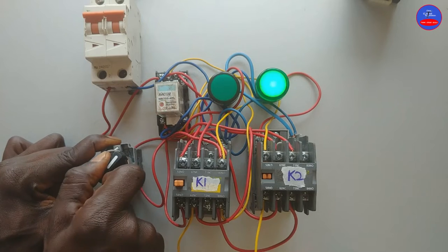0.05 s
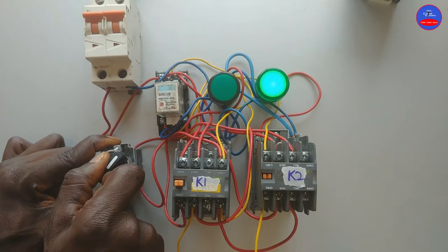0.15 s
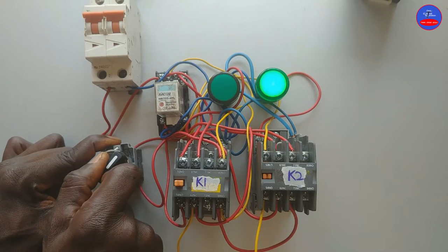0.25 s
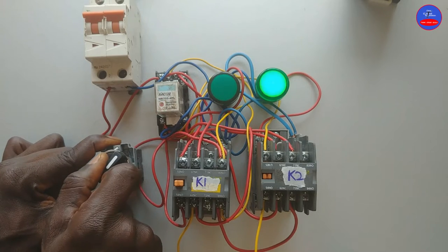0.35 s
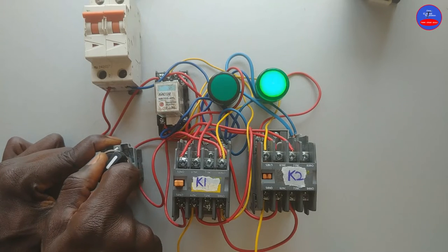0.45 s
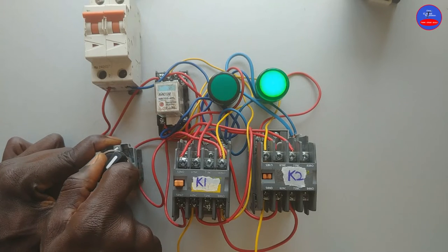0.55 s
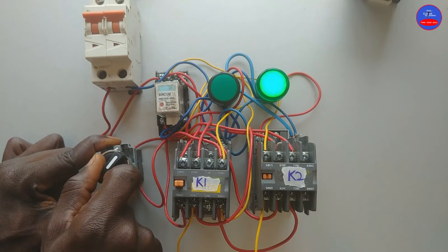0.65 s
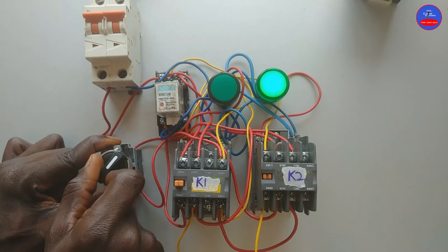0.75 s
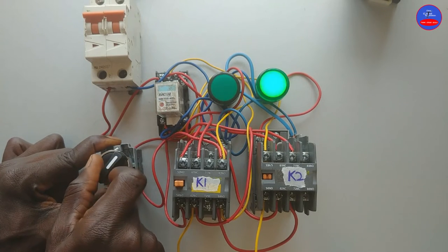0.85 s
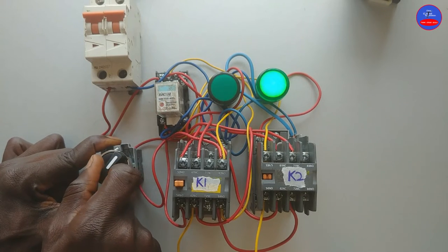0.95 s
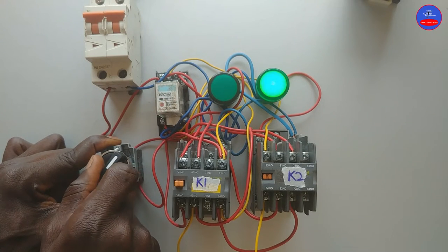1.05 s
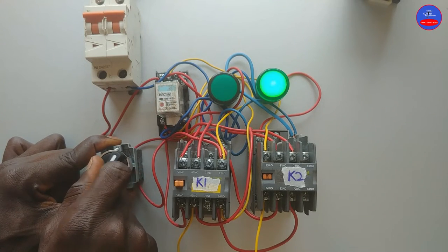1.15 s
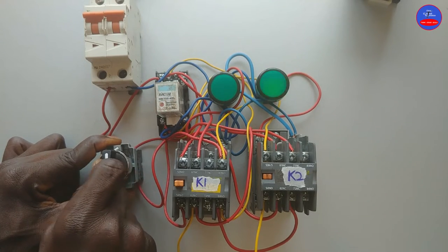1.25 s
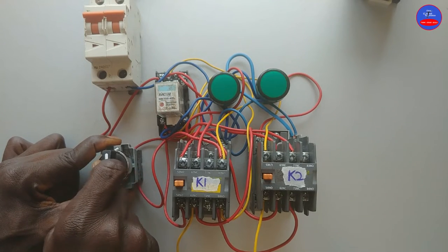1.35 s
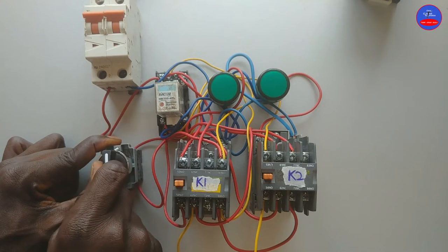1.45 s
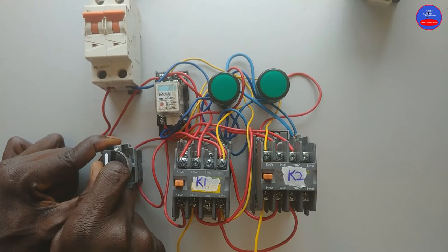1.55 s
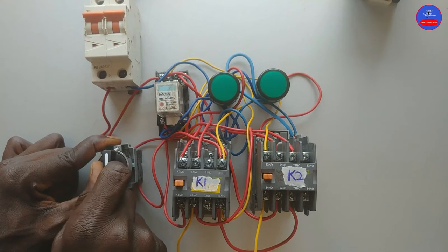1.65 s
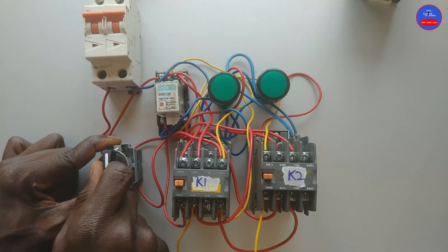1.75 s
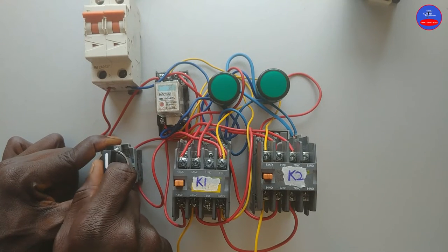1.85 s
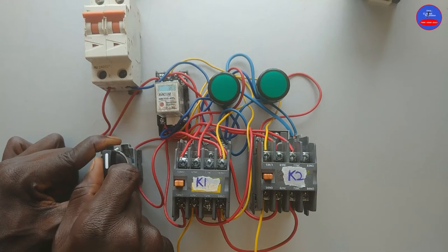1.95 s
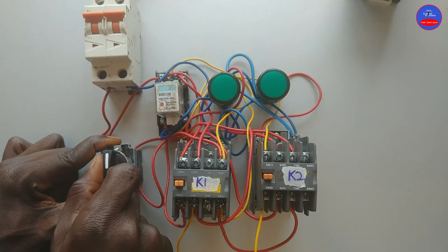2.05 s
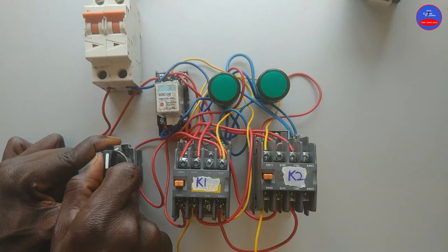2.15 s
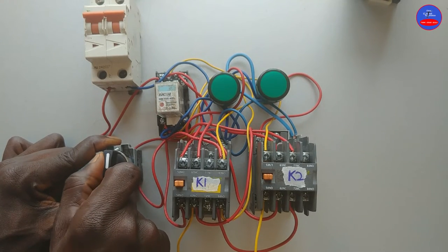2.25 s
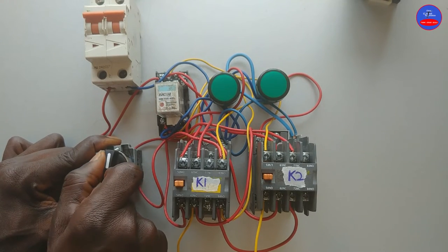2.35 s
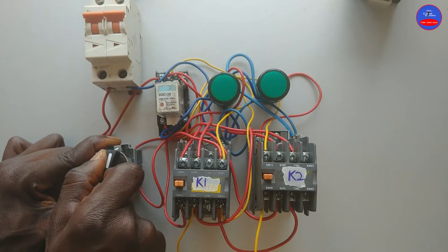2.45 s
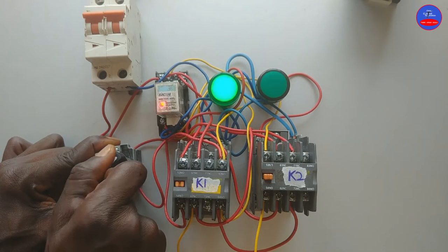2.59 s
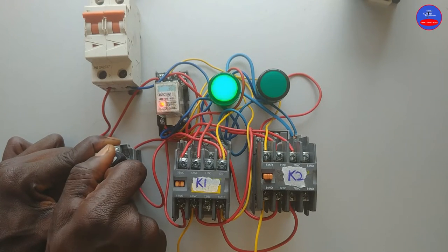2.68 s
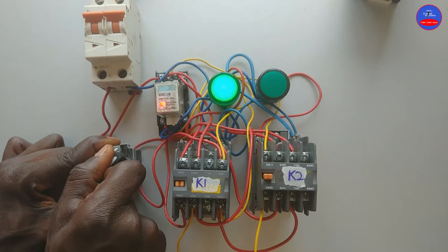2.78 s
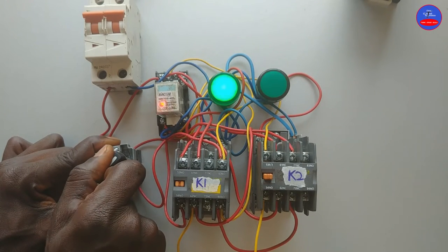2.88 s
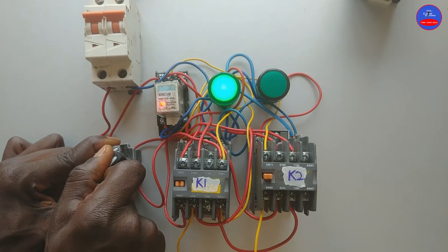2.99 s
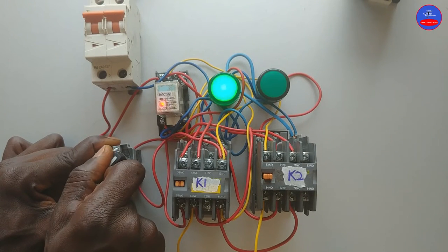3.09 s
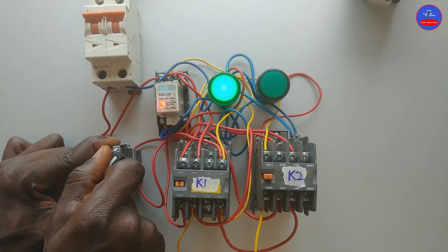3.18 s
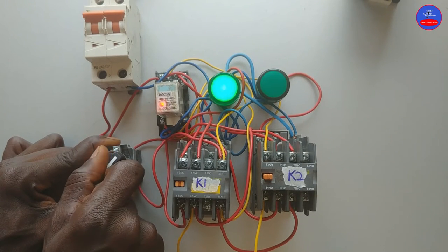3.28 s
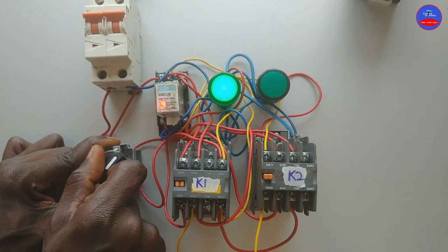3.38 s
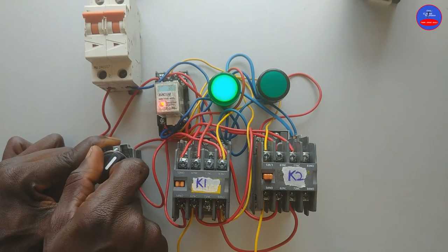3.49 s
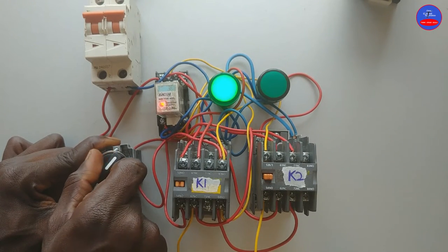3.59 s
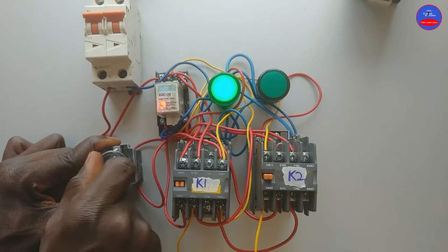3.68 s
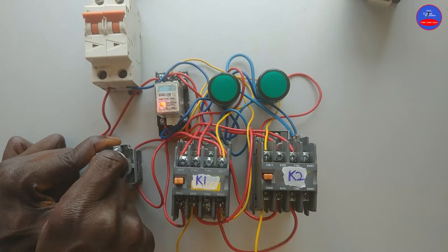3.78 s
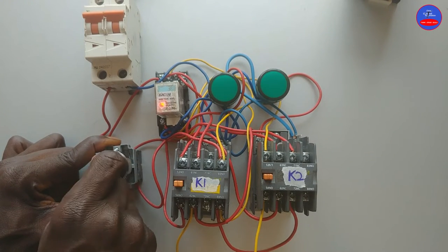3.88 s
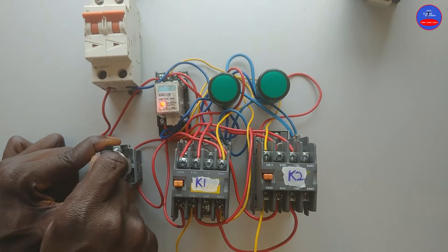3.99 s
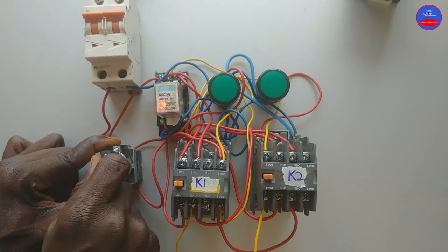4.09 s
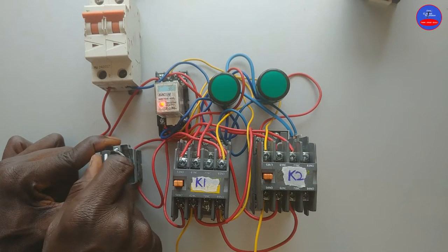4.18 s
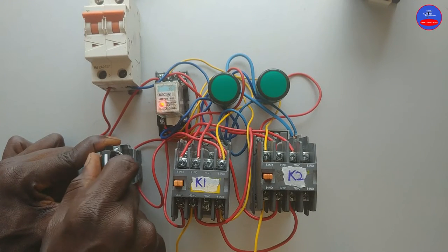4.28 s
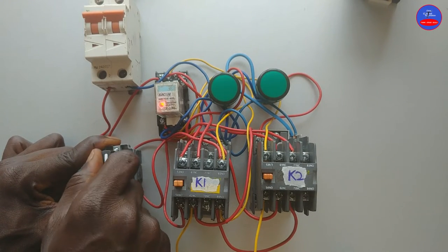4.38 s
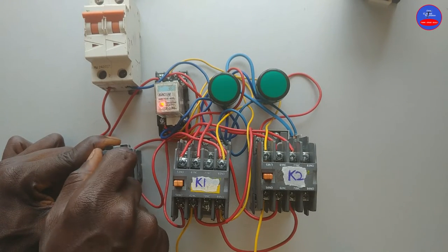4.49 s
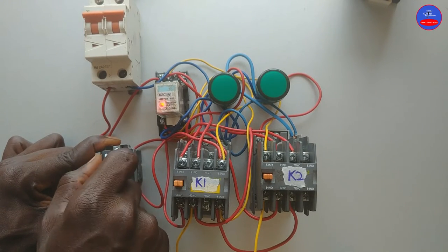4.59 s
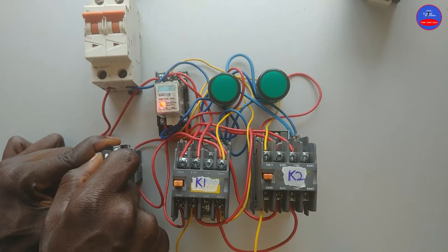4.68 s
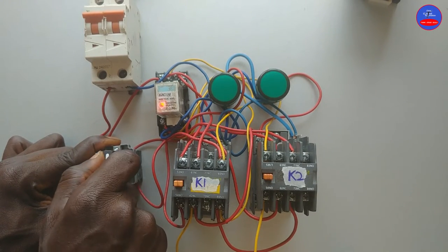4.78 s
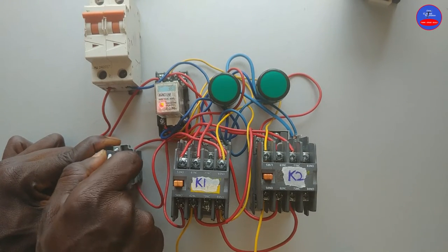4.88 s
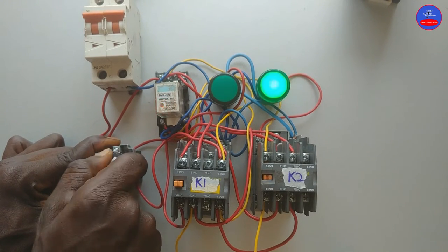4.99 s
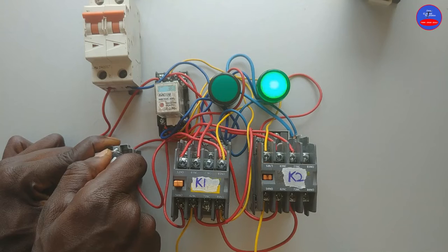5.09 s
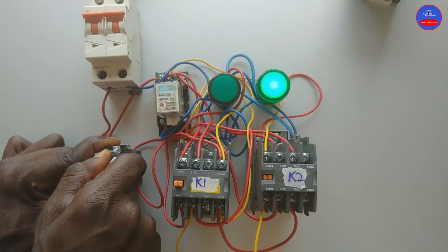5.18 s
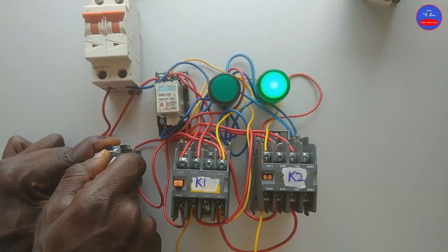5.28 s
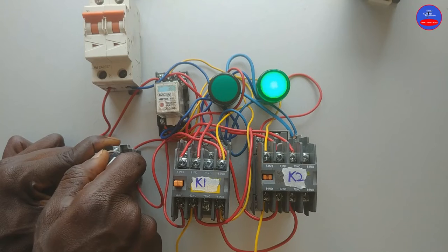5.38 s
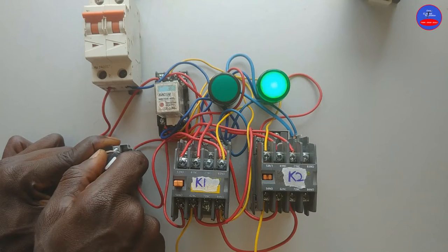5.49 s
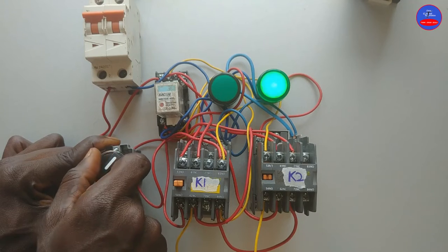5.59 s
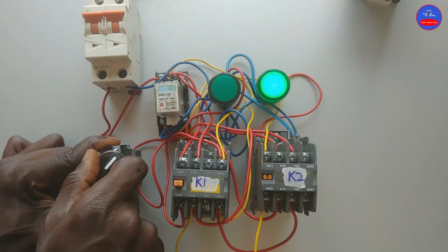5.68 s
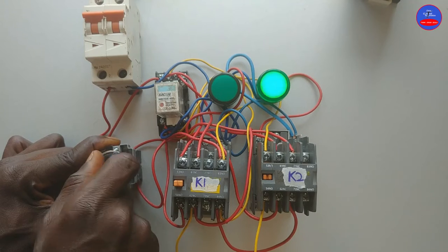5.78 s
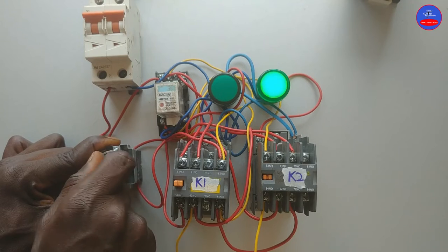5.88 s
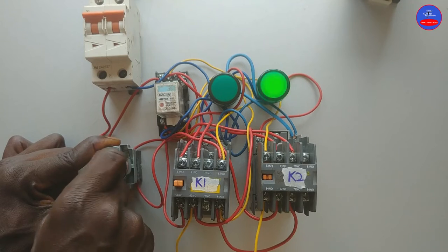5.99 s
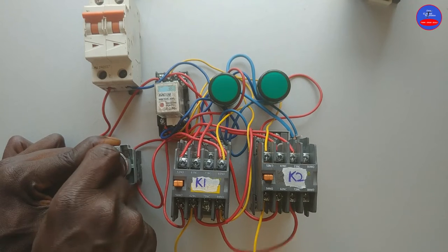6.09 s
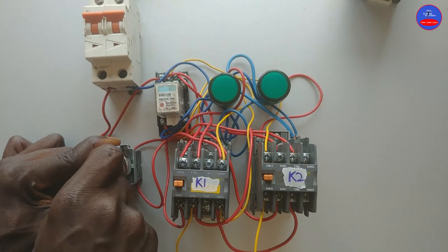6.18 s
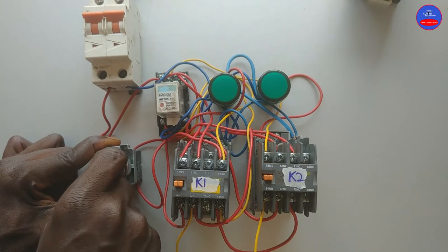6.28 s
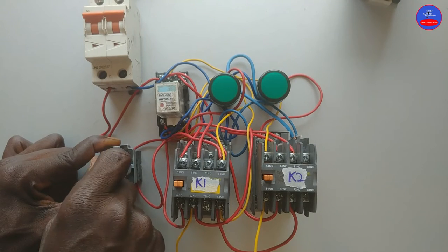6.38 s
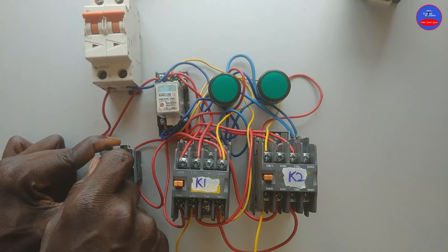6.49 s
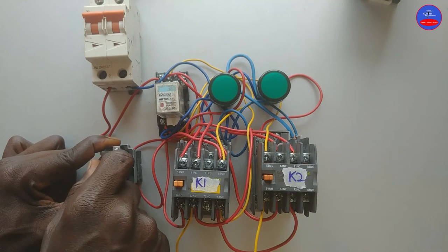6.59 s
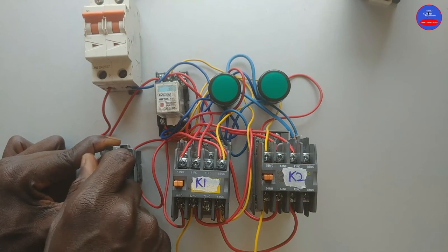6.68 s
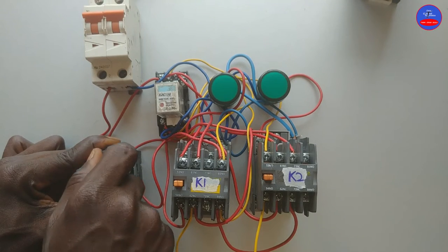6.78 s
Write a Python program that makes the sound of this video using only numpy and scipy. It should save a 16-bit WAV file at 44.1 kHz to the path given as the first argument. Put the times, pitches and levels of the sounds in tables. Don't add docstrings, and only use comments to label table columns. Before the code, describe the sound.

Sharp plastic-and-steel clacks snap out at uneven gaps of about one to one and a half seconds, echoing in a bare room, with faint knob scrapes before them.

```python
import sys
import numpy as np
from scipy import signal
from scipy.io import wavfile
from scipy.ndimage import uniform_filter1d

SR = 44100
rng = np.random.default_rng(int(sys.argv[2]) if len(sys.argv) > 2 else 0)


def generate_wav(signal):
    frames = np.transpose(np.atleast_2d(signal))
    scaled = np.clip(frames, -1, 1) * 32767
    pcm = np.round(scaled).astype(np.int16)
    wavfile.write(sys.argv[1], SR, pcm)


def makeup_ratio(level_db):
    decades = np.asarray(level_db, float) / 20
    return 10 ** decades


N = 302085

# [f/Hz, level/dB, time to fall 60 dB/s]
TABLE_MODES = [(92, -11.5, 0.1), (120, 1, .27), (165, -5, 0.36), (234.5, -6, 0.36), (326, -10, 0.36),
               (402, -9.5, 0.29), (440, -11, 0.3), (470, -21.5, 0.13), (536, -24, 0.25), (612, -13.5, .4),
               (770, -11.5, 0.25)]
# [f/Hz, width/Hz, level/dB]
KNOB_PEAKS = [(800, 1500, -8), (1008, 120, 2), (1200, 200, 3), (1880, 820, -22)]
# [f/Hz, width/Hz, level/dB]
SHAFT_PEAKS = [(1900, 900, 3.5), (2700, 700, -1), (3300, 500, -5.5), (4700, 500, -8.5)]


def evened(x):
    return x / np.sqrt(np.mean(x ** 2) + 1e-20)


def read(points, hz):
    f, value = np.transpose(points)
    return np.interp(np.log(hz + 1), np.log(f + 1), value)


def add(mix, s, sound):
    part = mix[..., round(s * SR):][..., :sound.shape[-1]]
    part += sound[..., :part.shape[-1]]


def causal(points):
    half = read(points, np.fft.rfftfreq(2048, 1 / SR)) / 20 * np.log(10)
    full = np.r_[half, half[-2:0:-1]]
    taps = np.fft.ifft(np.exp(full - 1j * signal.hilbert(full).imag)).real[:1024]
    return taps / np.linalg.norm(taps)


def ringing(modes, seconds):
    t = np.arange(round(seconds * SR)) / SR
    taps = sum(makeup_ratio(db - 60 * t / t60) * np.sin(2 * np.pi * hz * t) for hz, db, t60 in modes)
    return taps / np.linalg.norm(taps)


def damped(peaks):
    return ringing([(hz, db, np.log(1000) / np.pi / width) for hz, width, db in peaks], .03)


def hush():
    # [f/Hz, level per Hz/dB]
    colour = [(18, -55), (30, -28.5), (84, 2), (112, -1.5), (161, -9), (239, -7.5), (287, -12),
              (1010, -23.5), (2480, -30), (5310, -32.5), (10500, -42.5), (14800, -36), (16000, -54)]
    # [f/Hz, likeness 0 to 1]
    likeness = [(60, 0.61), (200, 0.6), (500, 0.045), (1500, 0.092), (8000, .02)]
    # [f/Hz, level/dB]
    balance = [(60, 4), (240, 4), (950, -4), (3770, -0.5), (15000, 0)]
    frames, hz = N // 512 + 5, np.fft.rfftfreq(2048, 1 / SR)
    a, b, c, d, patches = rng.standard_normal((frames, 1025, 5)).T
    patches = evened(uniform_filter1d(uniform_filter1d(patches, 20, 0), 8, 1))
    same = np.clip(read(likeness, hz), -1, 1)[:, None]
    left = a + 1j * b
    right = same * left + np.sqrt(1 - same ** 2) * (c + 1j * d)
    z = np.array([left, right])
    z *= makeup_ratio(read(colour, hz)[:, None] + patches)
    z[1] *= makeup_ratio(-read(balance, hz))[:, None]
    noise = signal.istft(z, nperseg=2048, noverlap=1536)[1][:, :N]
    return makeup_ratio(-53) * evened(noise)


def room(x):
    # [f/Hz, time to fall 60 dB/s]
    fade = [(120, .5), (330, 0.78), (870, 0.72), (2300, 0.7), (3600, 0.69), (6000, 0.55), (9000, 0.48),
            (14000, 0.35)]
    # [f/Hz, level/dB]
    colour = [(100, -16.5), (300, 4.5), (600, -4.5), (1000, -3.5), (1600, -3.5), (2000, 5), (2600, -1),
              (3500, -3), (3900, -1), (6000, -2.5), (10000, 0.5), (15000, -1.5)]
    # [f/Hz, likeness 0 to 1]
    likeness = [(100, 1), (300, 0.43), (700, 0.093), (1200, 0.47), (8000, 0.62)]
    taps = np.zeros((2, SR))
    at = np.arange(200, SR - 12, 12) + rng.integers(0, 12, (2, (SR - 201) // 12))
    np.put_along_axis(taps, at, rng.choice([-1., 1.], at.shape), 1)
    hz, t, z = signal.stft(taps, SR, nperseg=256)
    same = np.clip(read(likeness, hz), 0, 1)[:, None]
    z[1] = same * z[0] + np.sqrt(1 - same ** 2) * z[1]
    build = 1 - np.exp(-t / 0.011)
    z = z * build * makeup_ratio(read(colour, hz)[:, None] - 60 * t / read(fade, hz)[:, None])
    tail = signal.istft(z, SR, nperseg=256)[1][:, :32000]
    return signal.oaconvolve(x[None], tail / np.linalg.norm(tail[0]), axes=1)[:, :N]


def coil():
    start_s, end_s = 2.68, 3.86
    t = np.arange(N) / SR
    held = uniform_filter1d(1. * (t > start_s) * (t < end_s), 800)
    throb = 1 + .55 * np.cos(2 * np.pi * 8.2 * (t - 3.15))
    level_db = -40.5 - 7 * (t - start_s)
    return makeup_ratio(level_db) * held * throb * np.sin(2 * np.pi * 101 * t)


def hands():
    # [start t/s, length t/s, rumble level/dB, rub level/dB]
    pushes = [(0, .025, -36.5, -52), (0.032, .06, -32.5, -55), (0.981, .03, -56.5, -74),
              (1.089, 0.13, -53, -68), (1.274, 0.12, -44, -52), (2.291, .03, -57, -50),
              (2.38, .12, -44.5, -54.5), (2.512, 0.057, -47.5, -49), (2.641, 0.04, -42.5, -59),
              (3.52, 0.055, -47.5, -63), (3.822, 0.0086, -49.5, -54.5), (4.291, 0.061, -46, -62),
              (4.718, .08, -62, -60), (4.856, 0.022, -50.5, -50), (4.911, .1, -44.5, -58.5),
              (5.006, 0.023, -38, -43), (5.74, 0.16, -52, -73), (5.883, 0.099, -54.5, -71),
              (6.009, 0.04, -43, -55), (6.057, 0.029, -44.5, -59)]
    press_s, ease_db_per_s = 0.0089, 297
    rumble, rub, t = np.zeros(N), np.zeros(N), np.arange(N) / SR
    for start, length, rumble_db, rub_db in pushes:
        rise = np.clip((t - start) / press_s, 0, 1)
        press = rise * makeup_ratio(-ease_db_per_s * np.clip(t - start - length, 0, 1))
        rumble += makeup_ratio(rumble_db) * press
        rub += makeup_ratio(rub_db) * press
    shoves = signal.lfilter([1], [1, -.93], rng.standard_normal(N))
    grains = rng.standard_normal(N) * makeup_ratio(2.0 * rng.exponential(1, N).clip(0, 5))
    grains = grains * makeup_ratio(5 * evened(uniform_filter1d(shoves, size=300)))
    quick_table = ringing([(hz, db, 0.65 * t60) for hz, db, t60 in TABLE_MODES], .2)
    low = evened(signal.oaconvolve(shoves, quick_table)[:N])
    knob = np.convolve(damped(KNOB_PEAKS), damped(KNOB_PEAKS))[:1024]
    body = knob + makeup_ratio(-6) * damped(SHAFT_PEAKS)[:1024]
    scrape = evened(signal.oaconvolve(grains, body)[:N])
    return makeup_ratio(3.5) * low * rumble, makeup_ratio(6.5) * scrape * rub


def blow(row, case, steel, burst_ms, thump_db, room_db, air, walls, wood):
    # [f/Hz, level per Hz/dB]
    spray = [(4000, -37), (5600, 4), (6800, -13), (8800, -2), (10400, -9.5), (12500, 2), (14500, 5),
             (15800, -1), (19000, -9.5)]
    s, blow_db, table_db, upper_db, fizz_db, pan_db = row
    t = np.arange(900) / SR
    shape = (1 - np.exp(-t / 0.00017)) * np.exp(-t / (burst_ms / 1000))
    chatter = shape * rng.standard_normal((3, 900)) * makeup_ratio(rng.standard_normal((3, 900)))
    chatter /= np.linalg.norm(chatter, axis=1, keepdims=True)
    bodies = [damped(case), makeup_ratio(upper_db) * damped(steel), makeup_ratio(fizz_db) * causal(spray)]
    crack = sum(signal.fftconvolve(c, h)[:1800] for c, h in zip(chatter, bodies))
    left_right_db = np.array([[0], [7.5 - pan_db]])
    add(air, s, makeup_ratio(blow_db + 25.5) * crack * makeup_ratio(left_right_db))
    add(walls, s, makeup_ratio(blow_db + room_db) * sum(h[:1024] for h in bodies))
    push = t * np.exp(-t / 0.00019)
    add(wood, s, makeup_ratio(blow_db + table_db + thump_db) * push / push.sum())


def slips(air, walls, wood):
    # [t/s, blow level/dB, upper ring level/dB]
    knocks = [(.029, -38.5, -14), (0.057, -40.5, -15), (.079, -38.5, -11.5), (1.278, -44.5, -1.5),
              (1.308, -33.5, -16), (1.343, -40.5, -15.5), (2.298, -44, -21), (2.398, -54.5, -21),
              (2.507, -38.5, -20.5), (2.55, -44.5, -5.5), (2.632, -35.5, -13), (3.519, -44.5, -14.5),
              (3.819, -48.5, -16.5), (3.828, -40, -5.5), (3.843, -46.5, -5.5), (4.846, -40.5, -13),
              (4.922, -51.5, 0), (4.936, -38, -12.5), (4.951, -36, -37), (5.007, -35.5, -34),
              (6.017, -58.5, 5), (6.029, -43, -6)]
    for s, blow_db, upper_db in knocks:
        row = (s, blow_db, -1, upper_db, -33, 10)
        blow(row, KNOB_PEAKS, SHAFT_PEAKS, 4, 32, 22, air, walls[0], wood)


def switch_and_contactors(air, walls, wood):
    # [t/s, blow level/dB, table thump level/dB, upper ring level/dB, fizz level/dB]
    strikes = [
        [(0.0898, -20, -6, -20, -4.5), (0.0927, -7.5, -15, 0, -7.5), (0.0956, 0, -18.5, -1.5, -5.5)],
        [(1.3595, -4, -31, 0.5, -21), (1.3615, -2.5, -14.5, -9.5, -4.5)],
        [(2.6539, -29.5, 4.5, -11.5, -18.5), (2.6607, -3, -29, -1, 0.5), (2.6634, 7, -38, 1, -15.5)],
        [(3.8564, 2.5, -31, -12, -18), (3.8584, 0, -38, -7.5, -6)],
        [(5.0381, -11, -11, -19, -22), (5.0411, -3, -13, -1.5, -3.5), (5.0443, -6.5, -10.5, 2, -13)],
        [(6.0985, -11, -23.5, -2.5, -3), (6.1017, -5.5, -9, -5, -2)],
    ]
    strike_pan_db = (17.5, 20, 2.5)
    strike_room_db = (15, 19, 16.5)
    # [t/s, blow level/dB, table thump level/dB, upper ring level/dB]
    rebounds = [(.102, -7, -7.5, -5), (.110, -12, 1, -6), (1.3849, -7, -28, -0.5), (1.416, -12, 0.5, -13),
                (1.4249, -9, -6.5, -19.5), (1.441, -40, -21, 0), (2.693, -12, -5.5, -4),
                (2.701, -13, -12, -15.5), (2.714, -4, -15.5, -3), (3.8807, -3, -27.5, 1.5),
                (3.907, -12, -6, -10.5), (3.924, -8.5, -14.5, -28), (5.053, -6, -2.5, -7),
                (6.129, -3.5, -22, 0), (6.16, -7.5, -3, -13), (6.169, -12.5, -10, -12.5),
                (6.185, -13, -27.5, -16)]
    second_on = (2.62, 3.5, 4.2)
    # [f/Hz, width/Hz, level/dB]
    housings = [
        [(1090, 730, -1.5), (1457, 400, 7), (1840, 2200, -12.5)],
        [(973, 1100, -17), (1455, 370, 7.5), (2280, 1200, 2.5)],
        [(915, 280, -10.5), (1550, 250, 6.5), (2438, 210, -5.5)],
    ]
    # [f/Hz, width/Hz, level/dB]
    armatures = [
        [(2688, 460, 0.5), (3230, 320, -2.5), (3650, 890, 1), (4300, 940, -4), (4537, 2400, -8.5)],
        [(2550, 470, -0.5), (3405, 290, 1), (3604, 260, 2.5), (4030, 680, -7), (5150, 2000, -9.5)],
        [(2870, 190, -0.5), (3060, 250, -1), (3380, 220, 1.5), (4100, 500, -9), (4900, 500, -10.5)],
    ]
    clacks = []
    for turn in strikes:
        for stage, (row, pan_db, room_db) in enumerate(zip(turn, strike_pan_db, strike_room_db)):
            clacks.append((*row, pan_db, stage == 0, 2.2, room_db))
    for row in rebounds:
        clacks.append((*row, -22.5, 5.5, False, 1.1, 20))
    for k, (*row, knob, burst_ms, room_db) in enumerate(sorted(clacks)):
        phase = np.searchsorted(second_on, row[0]) % len(second_on)
        case = KNOB_PEAKS if knob else housings[phase]
        wall = walls[k % len(walls)]
        blow(row, case, armatures[phase], burst_ms, 33, room_db, air, wall, wood)


def scene():
    air, walls, wood = np.zeros((2, N)), np.zeros((3, N)), np.zeros(N)
    switch_and_contactors(air, walls, wood)
    slips(air, walls, wood)
    rumble, rub = hands()
    flex = damped([(275, 160, 0)])
    table = signal.oaconvolve(wood, ringing(TABLE_MODES, .7))[:N]
    table = table + makeup_ratio(-9.5) * signal.oaconvolve(wood, flex)[:N] + rumble
    walls[1] += makeup_ratio(-7.0) * rub + makeup_ratio(-15) * table
    thin_bass = signal.butter(2, 465, "high", fs=SR, output="sos")
    direct = signal.sosfilt(thin_bass, air) + rub
    direct[1] = np.roll(direct[1], 16)
    echoes = sum(room(part) for part in walls)
    return direct + table + coil() + makeup_ratio(1.5) * echoes


def band_limit(x):
    return signal.sosfilt(signal.butter(12, 16400, fs=SR, output="sos"), x)


def record(dry):
    # [f/Hz, level/dB]
    right_port = [(60, -2), (300, 2), (600, -1), (1200, -5.5), (2500, -4.5), (5000, -6), (9000, -24.5),
                  (12000, -32), (15000, -22.5)]
    shade = causal(right_port) * makeup_ratio(-17.5)
    x = np.array([dry[0], signal.oaconvolve(dry[1], shade)[:N]])
    x = signal.sosfilt(signal.butter(3, 70, "high", fs=SR, output="sos"), x)
    power_db = 10 * np.log10(abs(uniform_filter1d(x ** 2, 260, origin=129)) + 1e-12)
    fall = np.arange(N) * 470.0 / SR
    peak_db = np.maximum.accumulate(power_db.max(0) + fall) - fall
    over_db = np.maximum(peak_db + 21, 0)
    duck_db = 0.19 * uniform_filter1d(over_db, 200, origin=99)
    slow_db = 10 * np.log10(abs(uniform_filter1d(x ** 2, 1500)) + 1e-12)
    below_db = np.clip(np.array([[-36], [-44]]) - slow_db, 0, 14)
    quiet_db = np.array([[.6], [.25]]) * below_db
    x = x * makeup_ratio(-duck_db - quiet_db) + hush()
    x = signal.sosfilt(signal.butter(2, 45, "high", fs=SR, output="sos"), x)
    x = signal.oaconvolve(x, signal.firwin(255, 15900, fs=SR)[None], "same")
    return band_limit(np.clip(x, -1, 1))


dry = scene()
out = record(dry)
generate_wav(out)
```